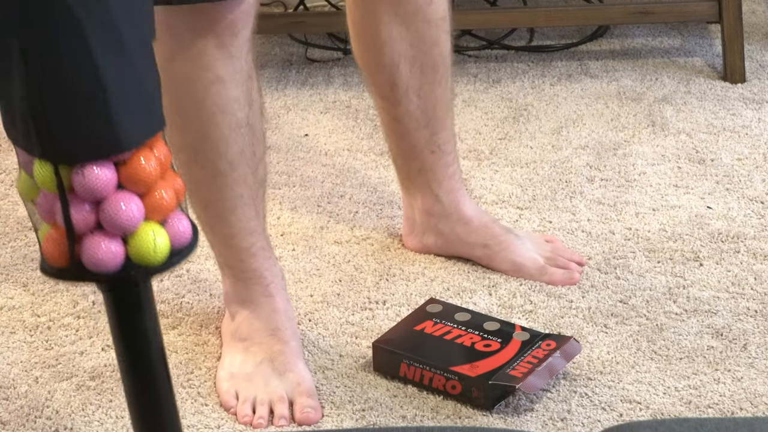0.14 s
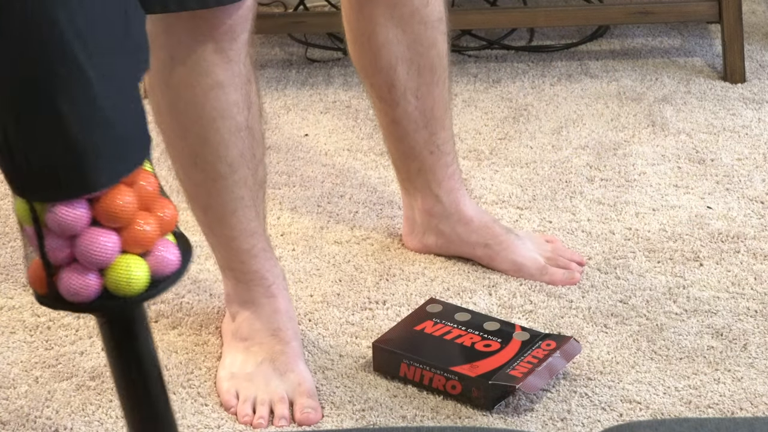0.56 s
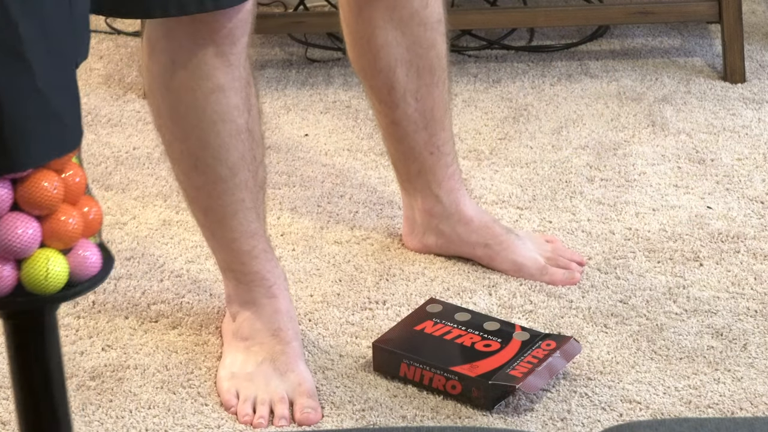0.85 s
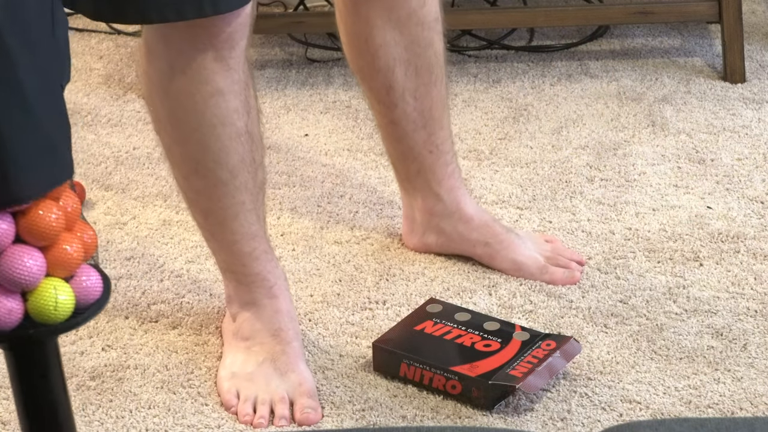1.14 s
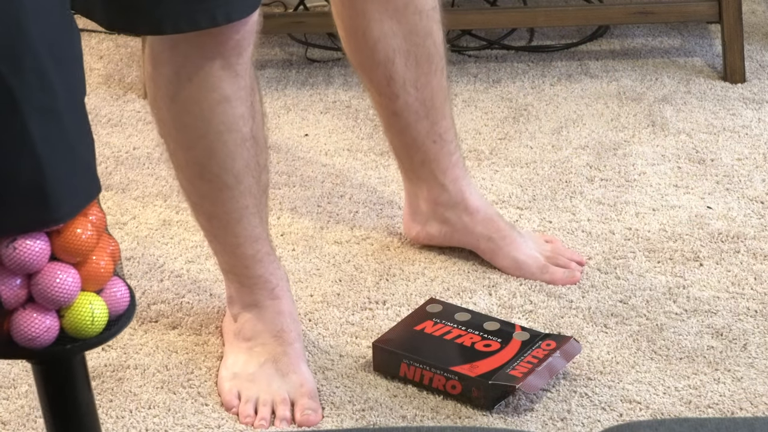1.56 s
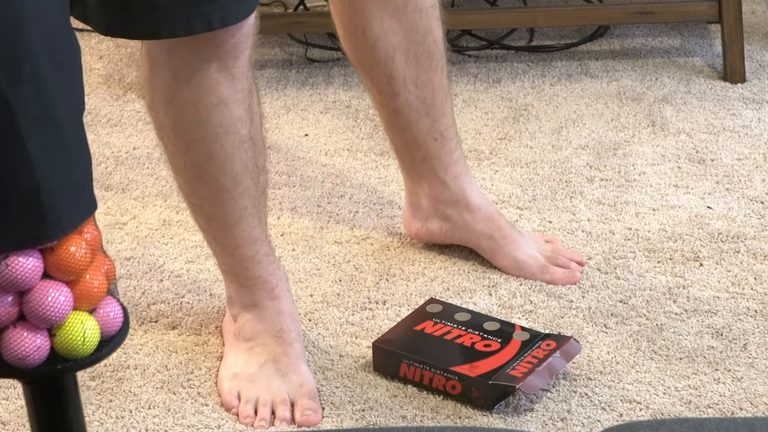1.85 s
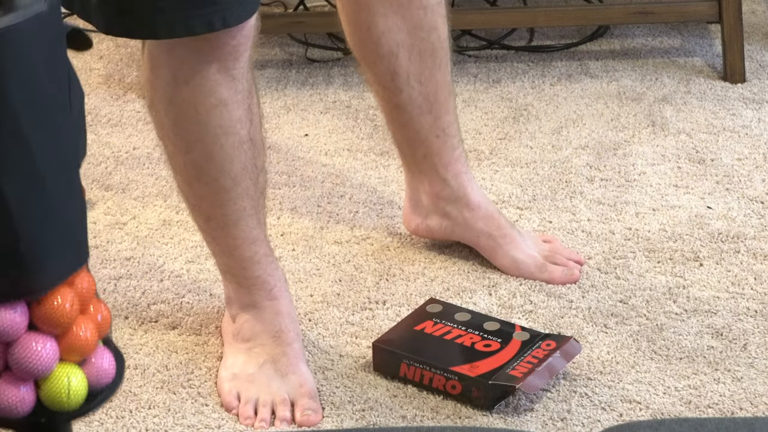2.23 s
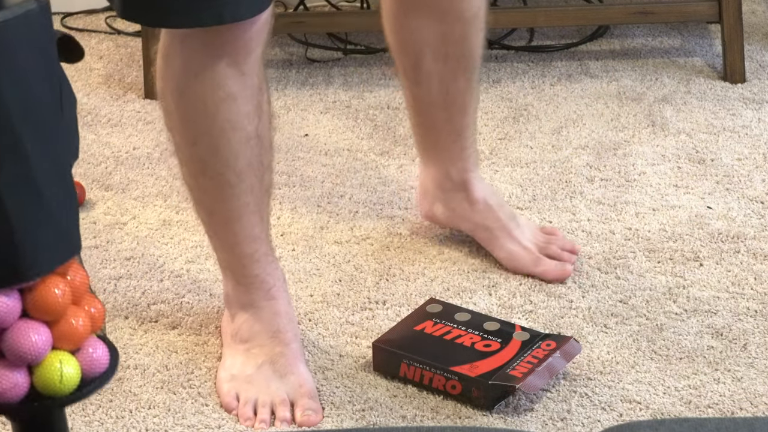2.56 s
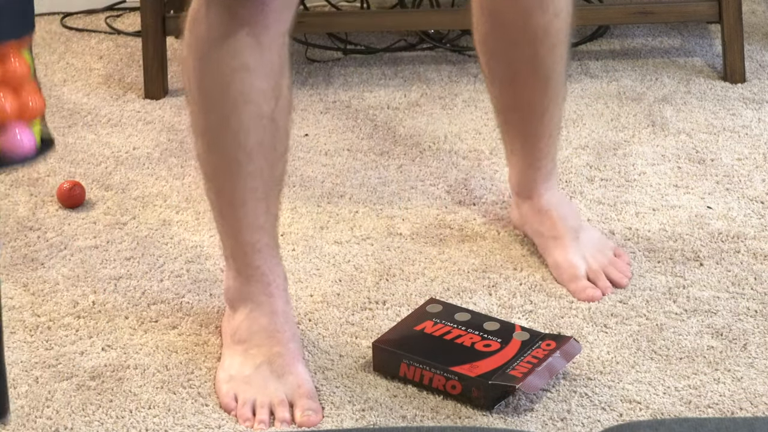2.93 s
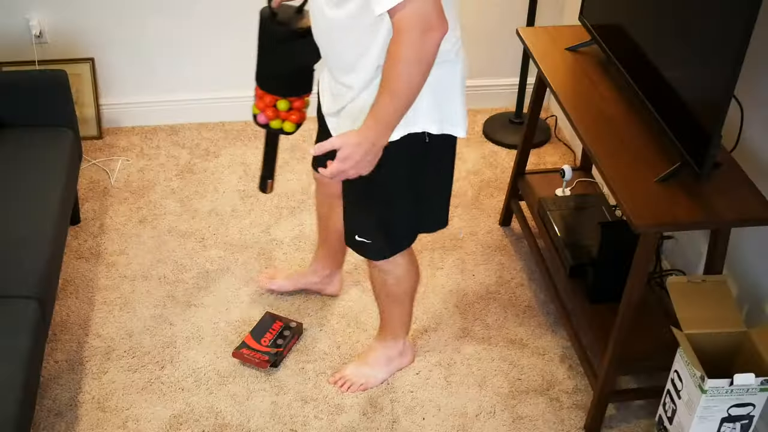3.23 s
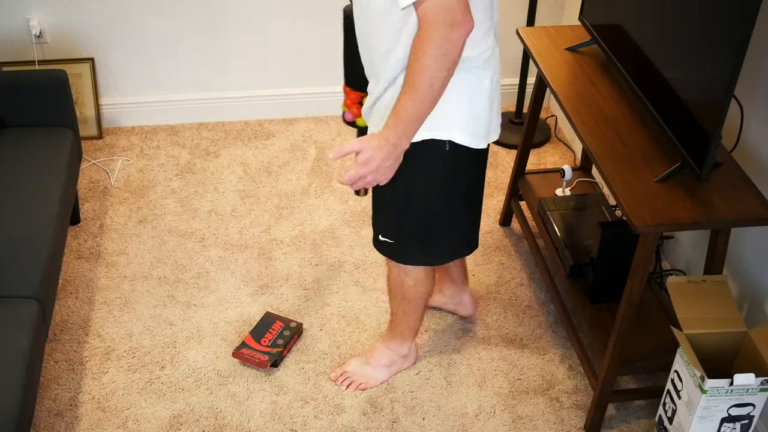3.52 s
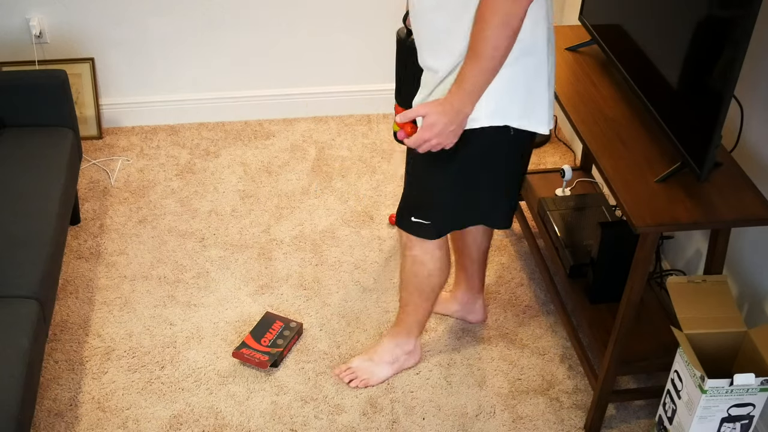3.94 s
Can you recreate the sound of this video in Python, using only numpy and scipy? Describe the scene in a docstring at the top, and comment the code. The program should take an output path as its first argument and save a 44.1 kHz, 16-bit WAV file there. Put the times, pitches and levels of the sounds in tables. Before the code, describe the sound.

Close to the microphone, golf balls knock and rattle in a hollow plastic tube: a dense loud burst first, then sparser clusters. Around two seconds in, a scrape with a quick falling squeak leads to strong knocks and a hard, bright clack. Afterwards only faint bumps, soft cloth and foot brushing, and low room hum remain in a carpeted living room.

```python
"""Golf balls are pressed into a pickup tube on a carpet in a living room.
Each push knocks the tube: ringing modes give the boom, coloured noise the rattle of the plastic catch.
Balls clack as struck modes and noise bursts, scrape as filtered grit and squeak as gliding harmonics.
Feet and clothes brush as soft filtered grit, an appliance hums in sines over noisy room air,
and the room answers with first reflections and a tail of about half a second."""
import sys
import numpy as np
from scipy import signal
from scipy.fft import rfft, irfft
from scipy.io import wavfile
from scipy.ndimage import uniform_filter1d

SR = 44100
rng = np.random.default_rng(int(sys.argv[2]) if len(sys.argv) > 2 else 0)


def put_to_file(sound):
    """Save the sound as 16-bit audio at rate SR, in the file named by the first command-line argument."""
    columns = np.atleast_2d(sound).T  # one column per channel
    safe = np.clip(columns, -1, 1)
    whole_steps = np.round(safe * 32767)
    wavfile.write(sys.argv[1], SR, whole_steps.astype(np.int16))


N = 180060
T = np.arange(N) / SR  # seconds
BLOW_S = 0.005  # a blow has the energy of a steady sound of rms 1 lasting this long
CHATTER_S = 0.013  # decay time of the chatter after a knock


def undb(db):
    """Decibels to gain."""
    return 10 ** (np.asarray(db) / 20)


def on_log_axis(hz, points):
    """Read (Hz, value) points on a logarithmic frequency axis."""
    f, value = np.transpose(points)
    return np.interp(np.log(np.maximum(hz, 1)), np.log(f), value)


def unit(x):
    """Scale to rms 1."""
    return x / np.sqrt(np.mean(x ** 2))


def blow(x):
    """Scale a response to the energy of one short blow at full level."""
    return x * np.sqrt(BLOW_S * SR / np.sum(x ** 2))


def through(x, response):
    """Pass a sound through an impulse response."""
    return signal.fftconvolve(x, response)[:N]


def add(track, s, sound):
    """Mix a short sound into a track at time s."""
    start = int(s * SR)
    track[start:start + len(sound)] += sound[:N - start]


def colour(points, size=8192):
    """Causal minimum-phase response of unit energy with the given spectrum."""
    level_db = on_log_axis(np.fft.rfftfreq(size, 1 / SR), points)
    cepstrum = irfft(np.log(undb(level_db)))
    # folding the cepstrum forward puts the energy at the start
    cepstrum[1:size // 2] *= 2
    cepstrum[size // 2 + 1:] = 0
    response = irfft(np.exp(rfft(cepstrum)))
    return response / np.sqrt(np.sum(response ** 2))


def ring(modes):
    """Damped modes of a struck body; the dB of each sets its energy."""
    t = T[:SR // 3]
    out = np.zeros(len(t))
    for hz, db, t60 in modes:
        fade = np.exp(-np.log(1000) * t / t60)
        out += undb(db) / np.sqrt(t60) * np.sin(2 * np.pi * hz * t) * fade
    return blow(out)


def grit(spread_db, size=N):
    """Dense micro-impacts of very uneven size."""
    sizes = undb(spread_db * rng.standard_normal(size))
    return unit(rng.standard_normal(size) * sizes)


def swells(rows):
    """Envelope of strokes that rise to a peak and fall away exponentially."""
    return sum(undb(db) * np.exp(-np.maximum((s - T) / rise, (T - s) / fall)) for s, rise, fall, db in rows)


def strike(response, decay, chatter):
    """One sharp push and its fading chatter, sounding through a body."""
    force = grit(4.76, size=4096) * np.exp(-T[:4096] / decay)
    force *= chatter / np.sqrt(np.sum(force ** 2))
    force[0] += 1  # the push itself
    return blow(signal.fftconvolve(force, response))


def hollow(hz, swell_s):
    """The air between the balls swells and dies within a few cycles; its pitch depends on how they lie."""
    t = T[:2048]
    return t * np.exp(-t / swell_s) * np.sin(2 * np.pi * hz * t)


# the stack of balls settling after a push: start_s, length_s, level_db, hardness_db
JOSTLE_ROWS = [(0.217, 0.25, -13, -7.5), (0.965, 0.09, -30.5, -12.5), (1.238, 0.12, -30, -10),
               (1.9, 0.15, -27.5, -4.5), (2.314, 0.095, -22, 7.5), (2.633, 0.09, -24, -8)]
JOSTLE_HZ, JOSTLE_SPREAD_OCT = 418, 0.22  # pitch of the hollow and its scatter from knock to knock
JOSTLE_FADE_DB = 1.5  # drop over the length of a jostle


def jostle(start, length, db, hardness, count=7):
    """Small knocks at uneven gaps, fading as the balls settle."""
    progress = (np.arange(count) + rng.random(count)) / count
    hz = JOSTLE_HZ * 2 ** (JOSTLE_SPREAD_OCT * rng.standard_normal(count))
    return [(start + length * p, db - JOSTLE_FADE_DB * p, f, hardness) for p, f in zip(progress, hz)]


# balls knocking in the tube: start_s, level_db, hollow_pitch_hz, hardness_db (rattle over boom)
KNOCK_ROWS = [(0.193, -12, 535, -6.5), (0.207, -9, 467, -8), (0.2422, -8.5, 513, 1.5),
              (0.2595, -7, 602, -6), (0.274, -13, 515, 2.5), (0.3, -5.5, 467.6, -8.5),
              (0.3294, -12, 427, -14), (0.344, -9.5, 444, -5), (0.379, -19.5, 450, 8),
              (0.41, -14.5, 390, -9.5), (0.499, -11, 487, -5.5), (0.722, -16.5, 434, -12),
              (0.95, -23.5, 400, -19), (1.015, -19.5, 428, -13.5), (1.213, -27, 440, -8.5),
              (1.228, -13, 392, -8), (1.2335, -12.5, 395, -8), (1.301, -13, 396, -12),
              (1.369, -15.5, 464, -13), (1.397, -26, 420, -9), (1.927, -20, 387, -8),
              (1.958, -19, 525, -9.5), (2.028, -22, 590, 4), (2.0538, -15, 430, -10.5),
              (2.125, -14.5, 474, -17), (2.142, -18.5, 657, -6), (2.18, -15, 346, -12.5),
              (2.271, -13.5, 456, -26), (2.2995, -26.5, 680, 20.5), (2.309, -24, 725, 14),
              (2.345, -9, 447, -6.5), (2.373, -9.5, 417, -3), (2.5818, -21, 387, -7),
              (2.618, -22, 490, 10.5)]


def all_knocks():
    """Balls knock as they are pressed in, and the stack jostles after some pushes."""
    return list(KNOCK_ROWS) + [knock for row in JOSTLE_ROWS for knock in jostle(*row)]


# soft bumps of balls shifting in the tube: start_s, level_db
BUMP_ROWS = [(0.682, -19.5), (0.773, -27.5), (1.53, -30.5), (1.848, -27.5), (3.037, -35), (3.285, -31),
             (3.349, -34.5), (3.443, -25), (3.473, -28)]
# modes of the hollow tube: pitch_hz, relative_level_db, t60_s
TUBE_MODES = [(134, -3.5, 0.069), (288, -3, 0.083), (364.5, 1, 0.06), (414, 4, 0.046), (583, -9.5, 0.027),
              (642, -1.5, 0.062), (721, 1, 0.034), (1098, -8, 0.02), (1345, -3, 0.016)]


def tube_boom(knocks):
    """A knock sounds the cavity around the ball and, more weakly, the whole tube; a bump only the cavity."""
    out, tube = np.zeros(N), ring(TUBE_MODES)
    for s, db, hz, _ in knocks:
        add(out, s, undb(db - 2.5) * strike(hollow(hz, swell_s=0.0016), CHATTER_S, chatter=1.8))
        add(out, s, undb(db - 4.5) * strike(tube, CHATTER_S, chatter=5.3))
    for s, db in BUMP_ROWS:
        add(out, s, undb(db) * strike(hollow(415, swell_s=0.0015), 0.025, chatter=0.99))
    # the open tube radiates hardly any deep bass
    return signal.sosfilt(signal.butter(4, 105, "high", fs=SR, output="sos"), out)


# colour of the rattling plastic: frequency_hz, relative_level_db
PLASTIC_COLOUR = [(40, -56), (130, -10.5), (250, -20), (480, -7), (750, 0), (1150, 7), (1400, 0.5),
                  (1650, -6.5), (2000, 0.5), (2550, -2.5), (3100, -0.5), (4300, -8), (5000, -16.5),
                  (16000, -49.5)]
# colour of the tick of the catch's edge: frequency_hz, relative_level_db
TICK_COLOUR = [(60, -51), (500, 10), (3000, -5.5), (5700, -5), (7200, -2), (8700, -11), (10200, -11),
               (11500, -16), (13500, -20), (16000, -43)]
TICK_DB = -15.5  # tick offset from the knock's level plus hardness


def catch_rattle(knocks):
    """The plastic catch chatters after each knock, more after a hard one; its edge adds a tick."""
    out, plastic, edge = np.zeros(N), colour(PLASTIC_COLOUR), colour(TICK_COLOUR)
    for s, db, _, hardness in knocks:
        add(out, s, undb(db + hardness - 0.15) * strike(plastic, CHATTER_S, chatter=5.8))
        add(out, s, undb(db + hardness + TICK_DB) * strike(edge, 0.5 * CHATTER_S, chatter=3.7))
    return out


# hard clacks of a ball: start_s, ring_db, crack_db, snap_db
CLACK_ROWS = [(0.2372, -40, -17.5, -27), (0.2509, -27, -8, -35), (0.4576, -13, -17, -15.5),
              (2.179, -52, -47, -38), (2.618, -9.5, -4, -16.5), (2.643, -15.5, -17, -28)]
# modes of a golf ball: pitch_hz, relative_level_db, t60_s
BALL_MODES = [(1960, -1.5, .05), (2034, 2, 0.095), (2370, -5.5, 0.012), (3445, 1.5, 0.0066),
              (3818, 0.5, 0.031), (4040, -2.5, 0.04), (10400, -23, 0.0028)]
# colour of the dry crack: frequency_hz, relative_level_db
CRACK_COLOUR = [(120, -9), (550, -4), (900, -19), (1550, -10), (2050, -0.5), (2800, -11), (4000, -5),
                (4900, -11), (5800, -5.5), (6900, -19), (9000, -18.5), (16000, -39)]
# colour of the high snap: frequency_hz, relative_level_db
SNAP_COLOUR = [(200, -47), (3000, 3), (5900, -0.5), (7800, 0.5), (9300, -9), (11300, -0.5), (13000, -14),
               (16000, -14)]
REBOUND_S, REBOUND_DB = 0.008, -7.5  # the ball strikes once more, softer


def ball_clacks():
    """A ball strikes hard and rebounds: a dry crack, a high snap and its own short ring."""
    out = np.zeros(N)
    ball, crack, snap = ring(BALL_MODES), colour(CRACK_COLOUR), colour(SNAP_COLOUR)
    for s, ring_db, crack_db, snap_db in CLACK_ROWS:
        for at, db in [(s, 0), (s + REBOUND_S, REBOUND_DB)]:
            add(out, at, undb(db + ring_db) * strike(ball, 0.0034, chatter=1.0))
            add(out, at, undb(db + crack_db) * strike(crack, 0.0022, chatter=1.17))
            add(out, at, undb(db + snap_db) * strike(snap, 0.0029, chatter=1.0))
    # the clacks carry no deep bass
    return signal.sosfilt(signal.butter(2, 130, "high", fs=SR, output="sos"), out)


# balls rubbing through the catch: peak_s, rise_s, fall_s, rub_db, hiss_db
SCRAPE_ROWS = [(0.254, 0.01, 0.0041, -31, -21), (.44, 0.051, 0.019, -30.5, -33.5),
               (0.73, 0.0017, 0.0078, -36, -34), (0.974, 0.012, 0.014, -44, -61),
               (1.229, 0.0039, .008, -26.5, -29), (1.926, 0.015, 0.0094, -31, -36),
               (2.045, 0.0042, .01, -50, -42), (2.145, 0.017, .025, -47, -42),
               (2.304, .016, 0.029, -11.5, -22)]
# colour of the rub: frequency_hz, relative_level_db
RUB_COLOUR = [(40, -27), (150, -1), (450, 20), (1200, 18), (3500, 13), (6000, -41), (9000, -26),
              (16000, -49)]
# colour of the edge hissing on a ball: frequency_hz, relative_level_db
HISS_COLOUR = [(60, -42), (1500, -8), (3500, 4), (5500, 3.5), (7000, -6.5), (9000, -5.5), (10300, -15),
               (16000, -20)]
DIMPLE_SPREAD_DB = 7  # unevenness of the micro-impacts


def catch_scrape():
    """Balls rub through the catch, and its thin edge hisses on their dimples."""
    rub = swells([(s, rise, fall, db) for s, rise, fall, db, _ in SCRAPE_ROWS])
    hiss = swells([(s, rise, fall, db) for s, rise, fall, _, db in SCRAPE_ROWS])
    rubbing = through(grit(DIMPLE_SPREAD_DB) * rub, colour(RUB_COLOUR))
    hissing = through(grit(DIMPLE_SPREAD_DB) * hiss, colour(HISS_COLOUR))
    return rubbing + hissing


# plastic squeaking on a ball: peak_s, rise_s, fall_s, level_db, pitch_hz (at the peak),
# drop_octaves, jitter_share (rms wander of the pitch)
SQUEAK_ROWS = [(0.869, 0.0057, 0.013, -46.5, 5810, 0.055, 0.019),
               (2.297, 0.0055, 0.0068, -3, 1062, 0.58, 0.051), (2.365, 0.019, .02, -50, 14600, 0, .012)]
SQUEAK_GLIDE_S = 0.0172  # time scale of the pitch drop on each side of the peak


def stick_slip(s, rise, fall, db, hz, drop, jitter, overtone_db):
    """Plastic grips and releases a ball at an unsteady rate that falls as the ball slips free."""
    glide = hz * 2 ** (-drop / 2 * np.tanh((T - s) / SQUEAK_GLIDE_S))
    waver = unit(uniform_filter1d(rng.standard_normal(N), size=60))
    phase = 2 * np.pi * np.cumsum(glide * (1 + jitter * waver)) / SR
    # up to three harmonics, each overtone_db below the last
    harmonics = [k for k in range(3) if (k + 1) * hz < SR / 2]
    wave = sum(undb(overtone_db * k) * np.sin((k + 1) * phase) for k in harmonics)
    return unit(wave) * swells([(s, rise, fall, db)])


# feet and clothes brushing: peak_s, rise_s, fall_s, level_db
BRUSH_ROWS = [(3.13, 0.067, 0.06, -42), (3.36, 0.14, 0.51, -47), (3.72, 0.066, 0.083, -46),
              (3.985, 0.033, 0.11, -39)]
# colour of cloth: frequency_hz, relative_level_db
CLOTH_COLOUR = [(40, -21), (100, -4), (400, 7.5), (1200, 4.5), (2300, 0), (3700, 0), (6000, -10.5),
                (15000, -27)]


def cloth_brush():
    """Feet and clothes brush softly: many uneven fibre contacts in slow strokes."""
    return through(grit(4.5) * swells(BRUSH_ROWS), colour(CLOTH_COLOUR))


# appliance hum at its full level: pitch_hz, level_db (rms)
HUM_TONES = [(78.6, -39), (119.5, -61), (176.5, -55.5), (240.5, -53.5)]
# colour of the room air: frequency_hz, relative_level_db
AIR_COLOUR = [(25, -48), (45, -2), (75, 0), (100, 2.5), (150, -9), (290, -5), (530, -15), (1480, -24.5),
              (2700, -27), (5400, -27), (11300, -31.5), (16000, -34)]
AIR_DB = -46.5  # rms


def background():
    """Steady room air as noise, and an appliance hum as sines that start 7 dB down and soon come up."""
    hum = sum(np.sqrt(2) * undb(db) * np.sin(2 * np.pi * (hz * T + rng.random())) for hz, db in HUM_TONES)
    air = undb(AIR_DB) * unit(through(rng.standard_normal(N), colour(AIR_COLOUR)))
    hum_gain_db = np.interp(T, [0.1, 0.3], [-7, 0])
    return air + hum * undb(hum_gain_db)


# reverberation of the room: frequency_hz, t60_s
REVERB_TIMES = [(100, 1), (400, 0.51), (1200, 0.62), (3500, 0.64), (7000, 0.5), (15000, 0.41)]
# first reflections of the room: delay_s, gain
FIRST_REFLECTIONS = [(.0032, 0.34), (.0086, 0.23), (.0235, .28), (0.0316, 0.16), (0.0387, .25)]


def room(build_s):
    """First reflections and a diffuse tail that builds up, then dies at its own rate in each band."""
    t, hz = T[:SR], np.fft.rfftfreq(SR, 1 / SR)
    noise, tail = rfft(rng.standard_normal(SR)), np.zeros(SR)
    build = 1 - np.exp(-(t / build_s) ** 2)
    edges = np.geomspace(40, 20480, 19)  # half-octave bands
    for lo, hi in zip(edges, edges[1:]):
        fade = np.exp(-np.log(1000) * t / on_log_axis(np.sqrt(lo * hi), REVERB_TIMES))
        band = irfft(noise * (hz >= lo) * (hz < hi)) * fade * build
        # energy in proportion to bandwidth
        tail += band * np.sqrt((hi - lo) / (SR / 2) / np.sum(band ** 2))
    for delay, gain in FIRST_REFLECTIONS:
        tail[int(delay * SR)] += gain
    return tail


def scene():
    """Mix all sources; those at the tube and balls each send their own share to the room."""
    knocks = all_knocks()
    boom, rattle = tube_boom(knocks), catch_rattle(knocks)
    clacks, scrape = ball_clacks(), catch_scrape()
    squeak = sum(stick_slip(*row, overtone_db=-17) for row in SQUEAK_ROWS)
    send = undb(-2.5) * boom + undb(-6.5) * (rattle + scrape) + undb(-4.0) * clacks + undb(-6.0) * squeak
    # carpet and sofa swallow the highest treble before it comes back
    send = signal.sosfilt(signal.butter(1, 10500, fs=SR, output="sos"), send)
    direct = boom + rattle + clacks + scrape + squeak + cloth_brush()
    return (direct + through(send, room(build_s=0.0091)) + background())[None]


TOP_HZ = 16000  # upper limit of the microphone


def record(dry):
    """The microphone rounds the loudest peaks and cuts the top."""
    rounded = dry / (1 + dry ** 4) ** (1 / 4)
    return signal.sosfilt(signal.ellip(10, 0.2, 70, TOP_HZ, fs=SR, output="sos"), rounded)


dry = scene()
out = record(dry)
put_to_file(out)
```